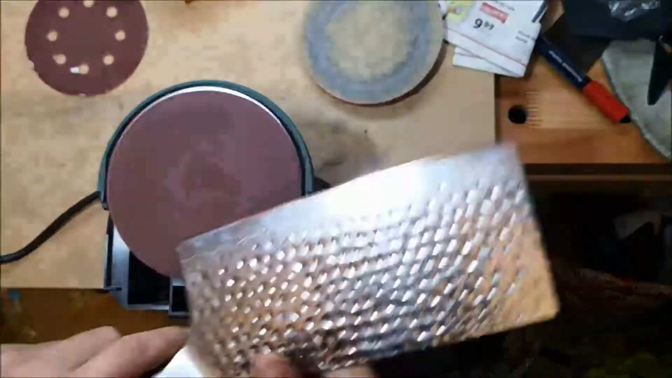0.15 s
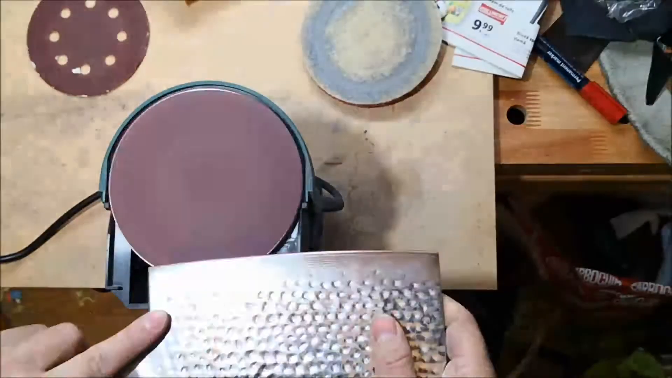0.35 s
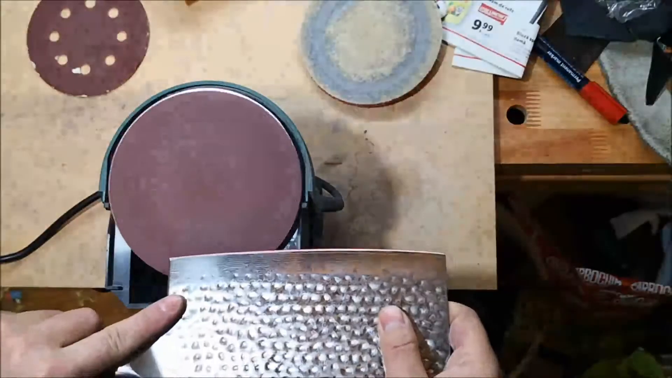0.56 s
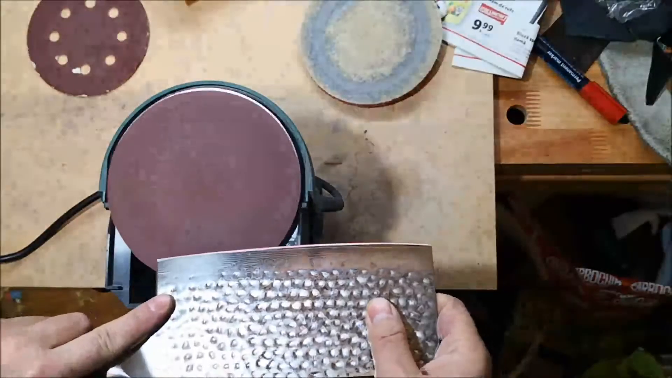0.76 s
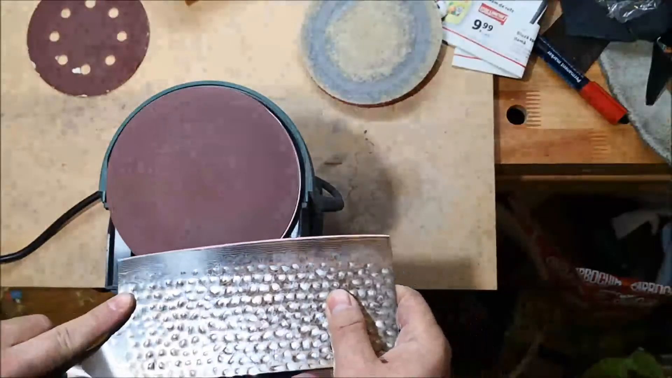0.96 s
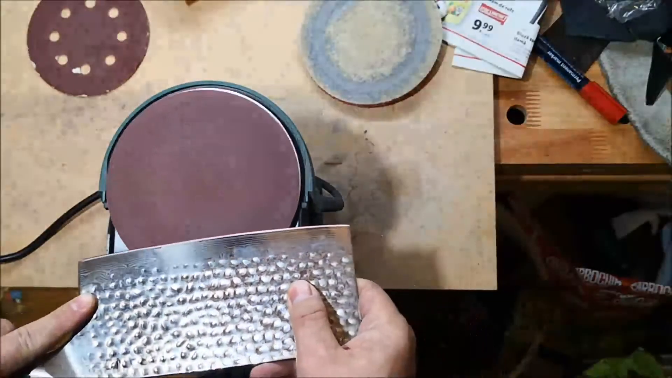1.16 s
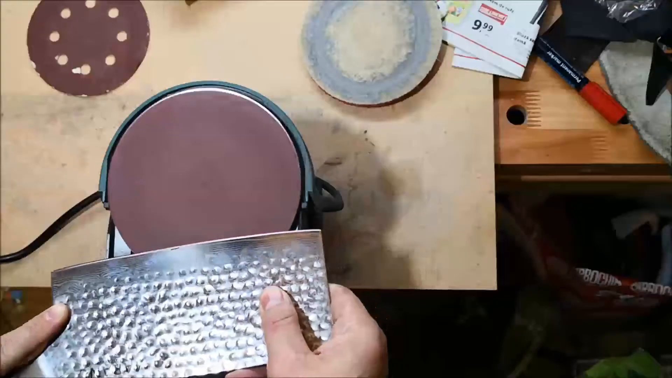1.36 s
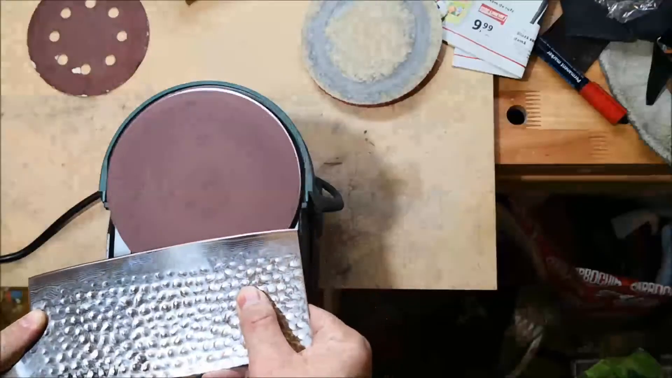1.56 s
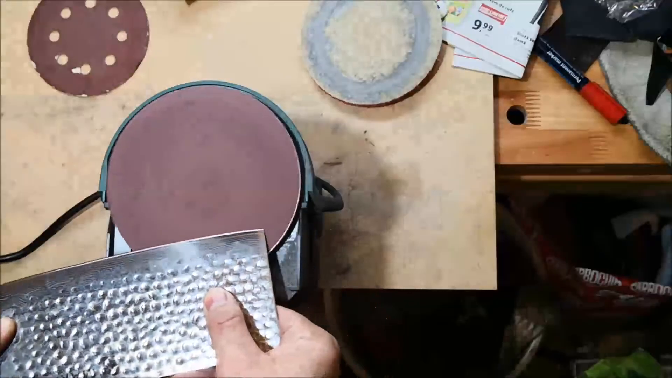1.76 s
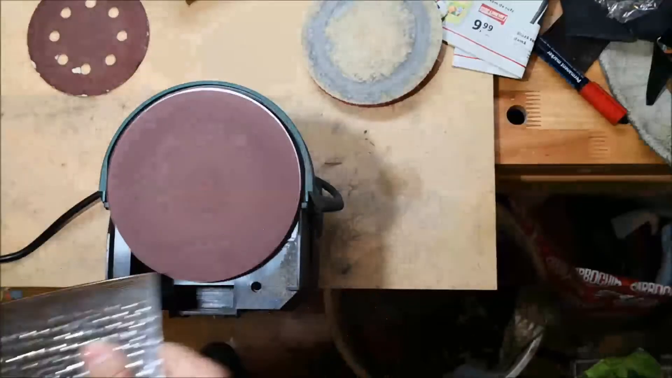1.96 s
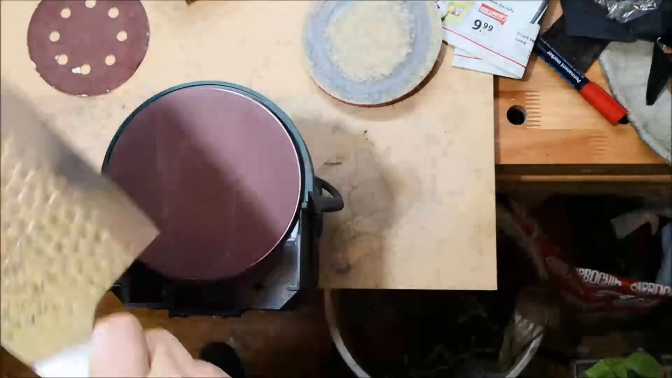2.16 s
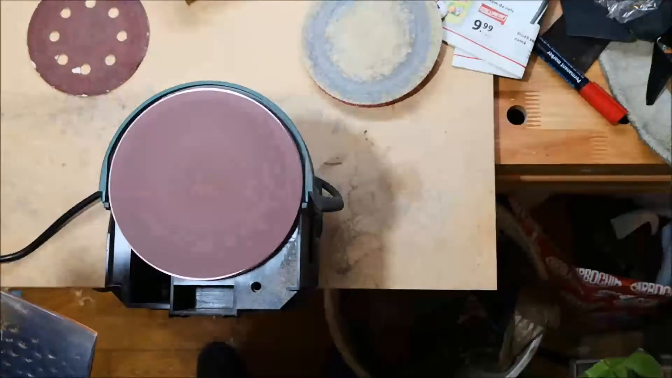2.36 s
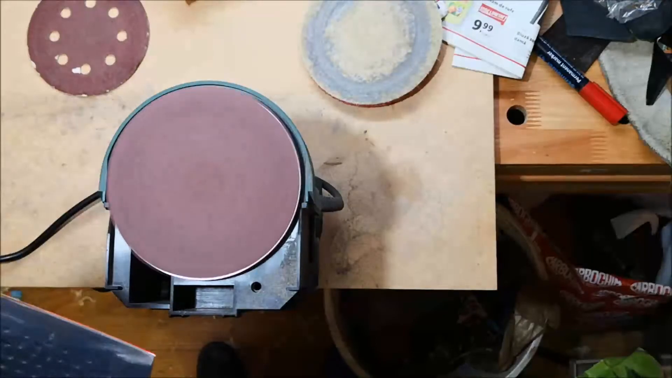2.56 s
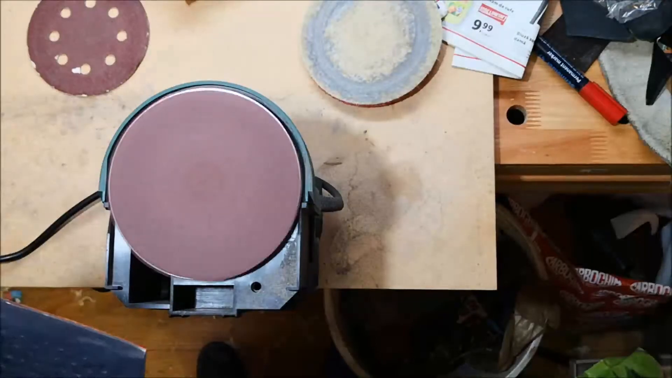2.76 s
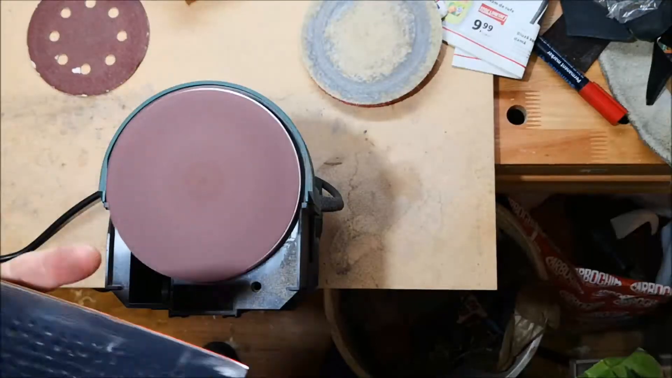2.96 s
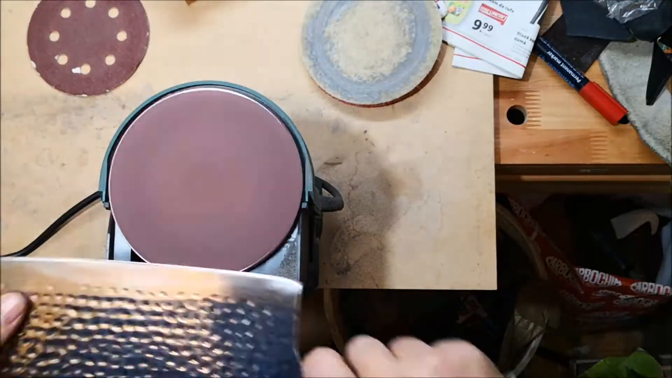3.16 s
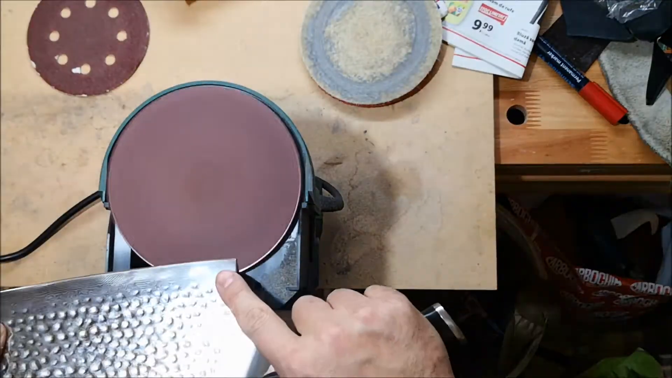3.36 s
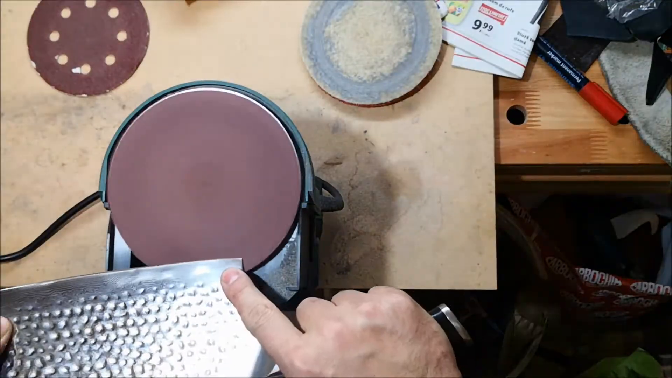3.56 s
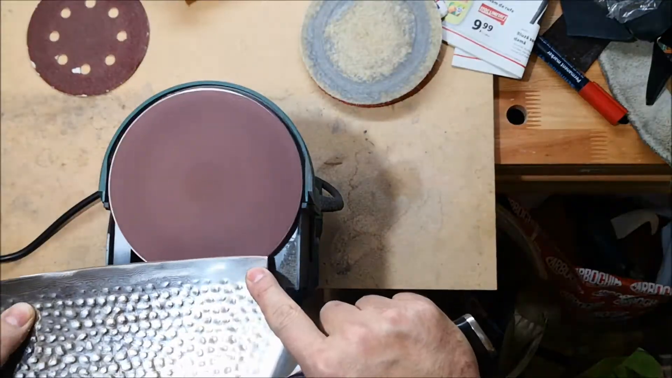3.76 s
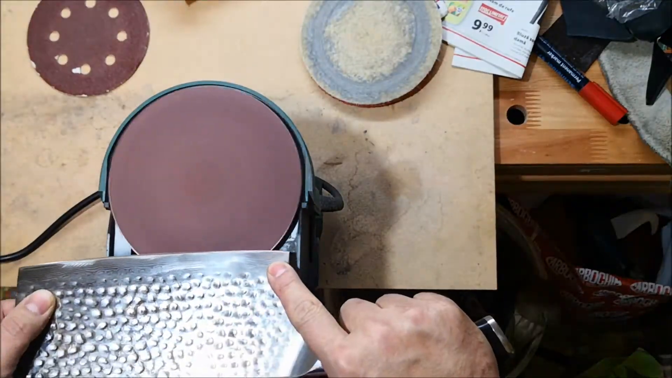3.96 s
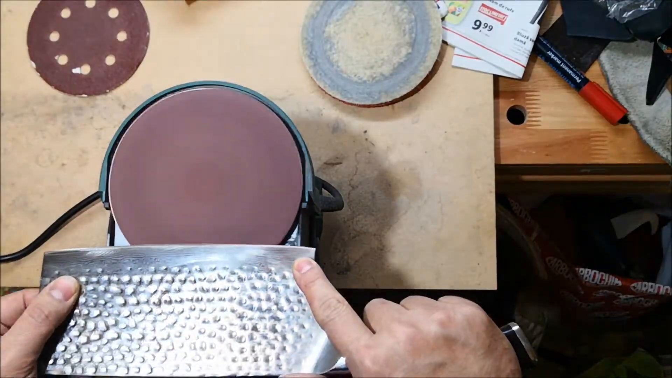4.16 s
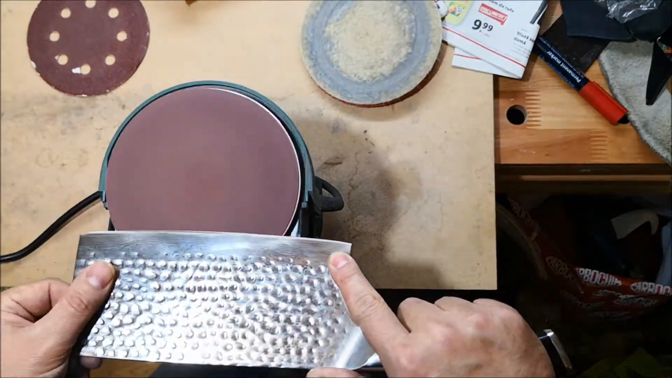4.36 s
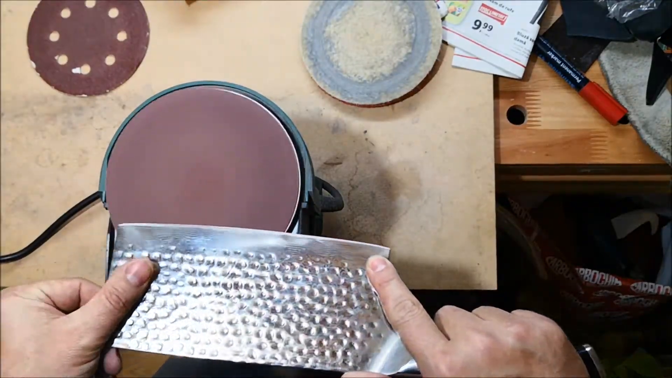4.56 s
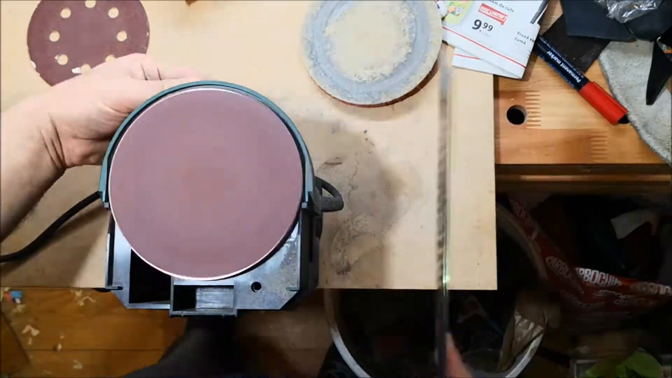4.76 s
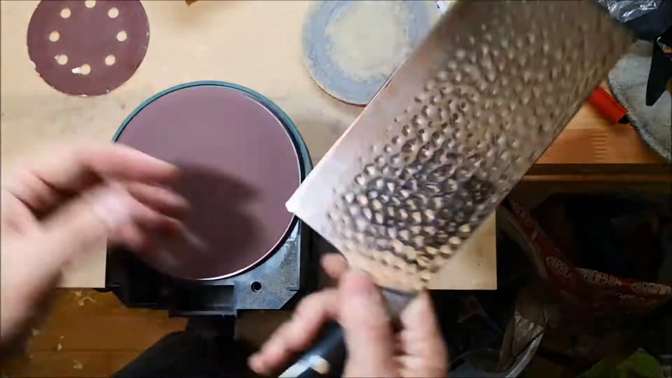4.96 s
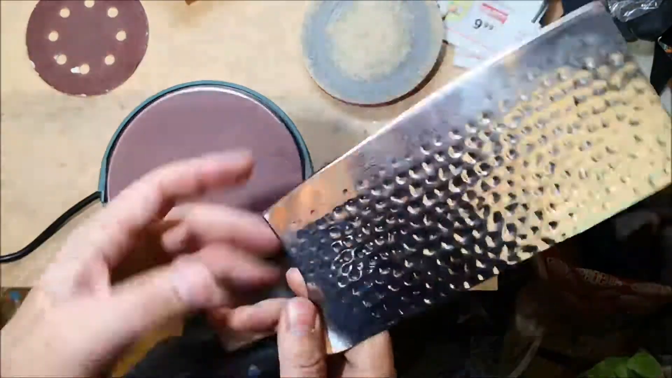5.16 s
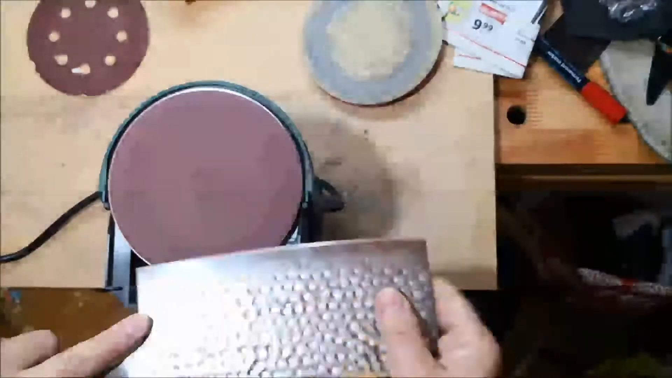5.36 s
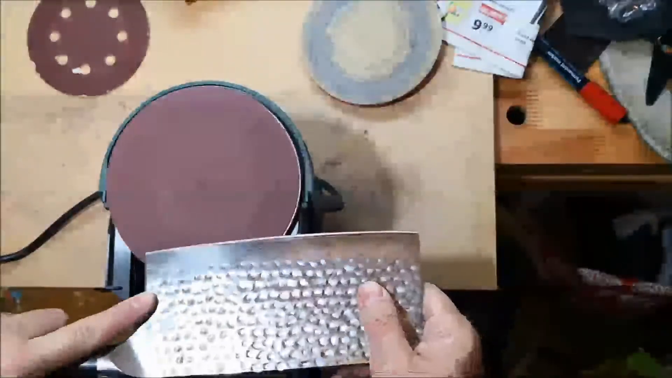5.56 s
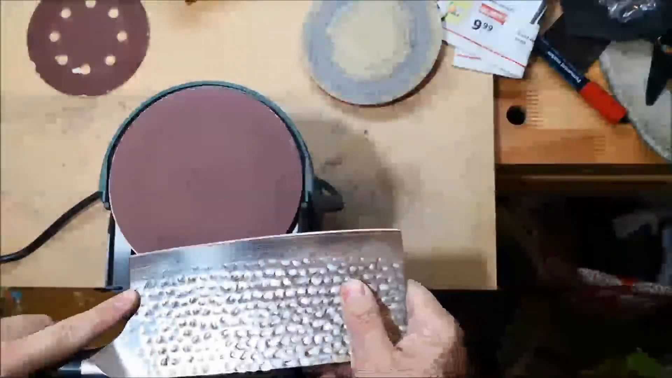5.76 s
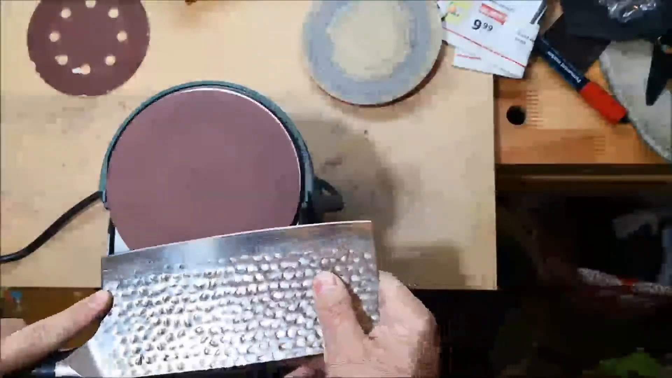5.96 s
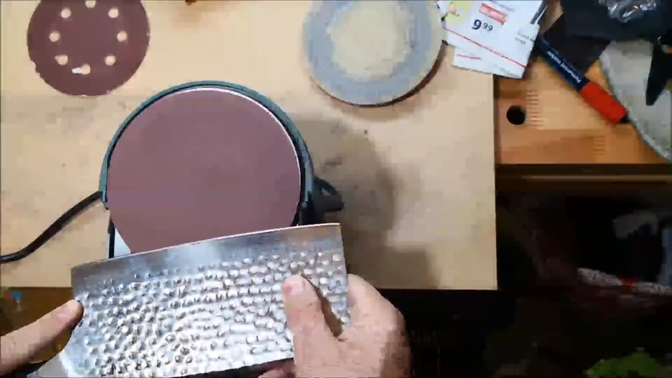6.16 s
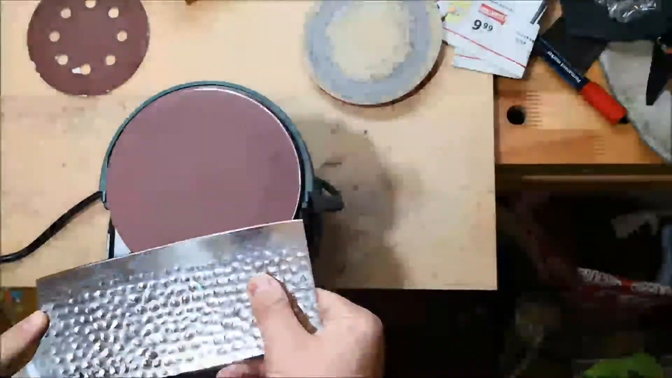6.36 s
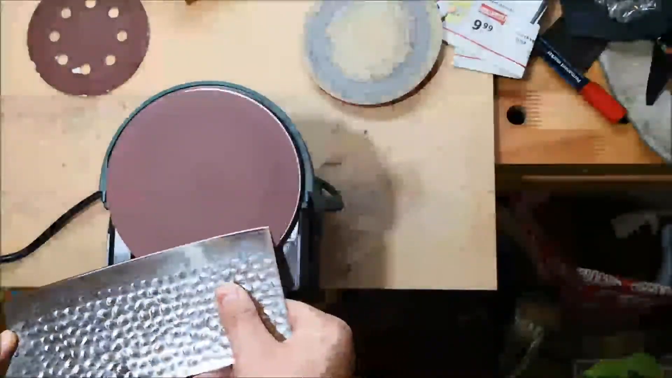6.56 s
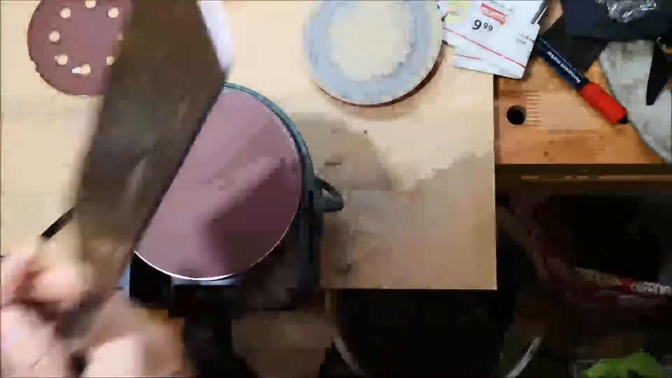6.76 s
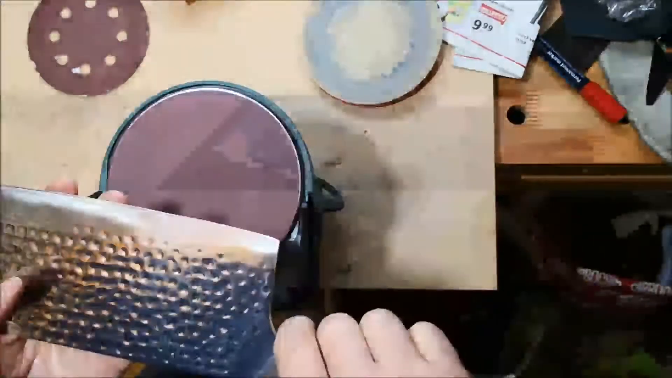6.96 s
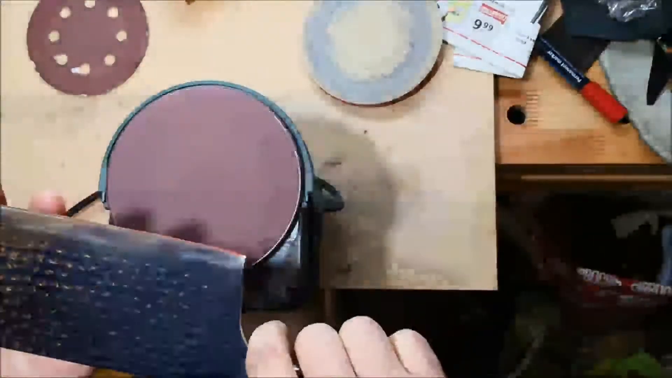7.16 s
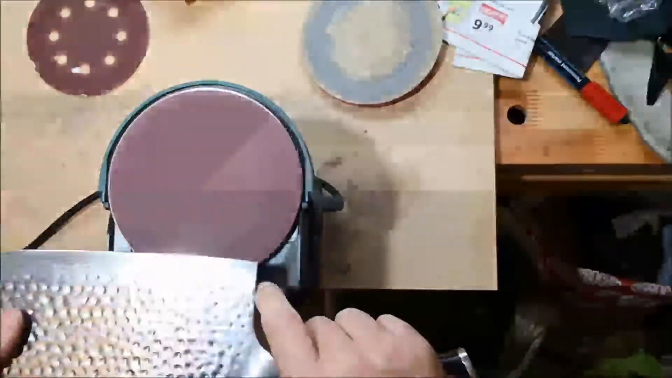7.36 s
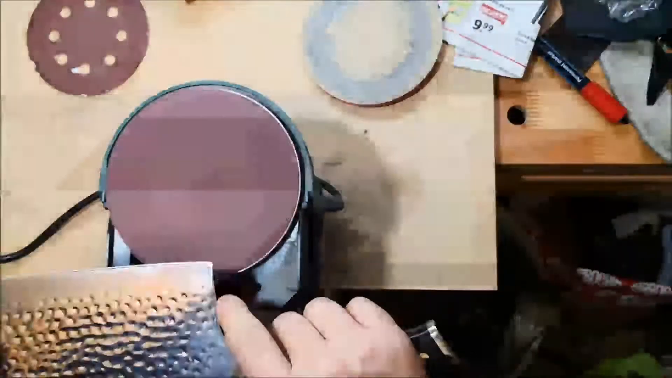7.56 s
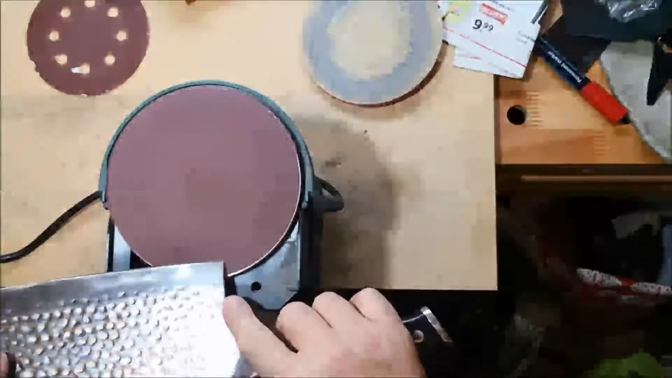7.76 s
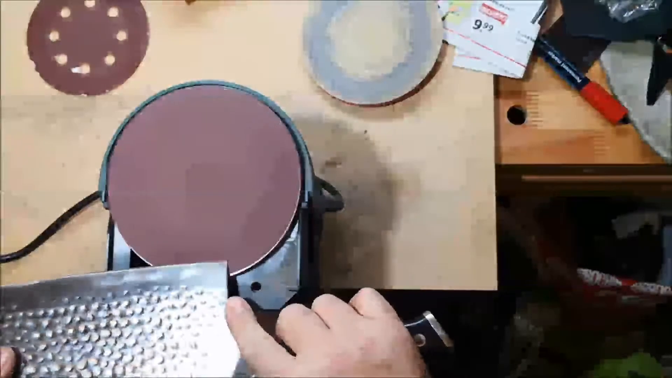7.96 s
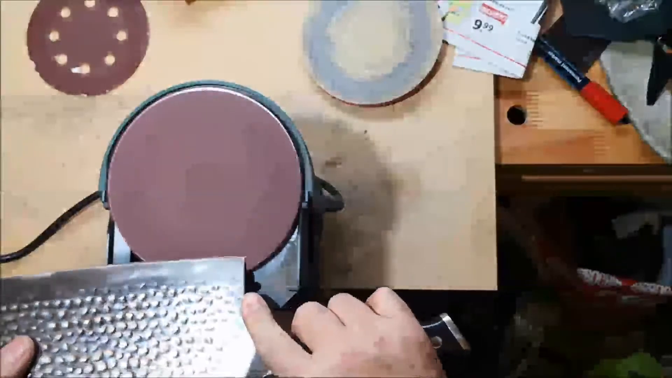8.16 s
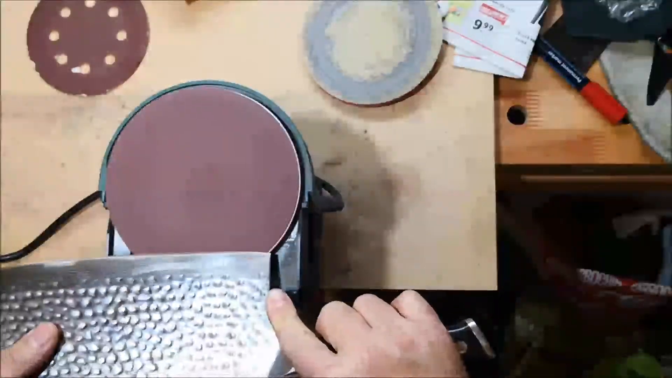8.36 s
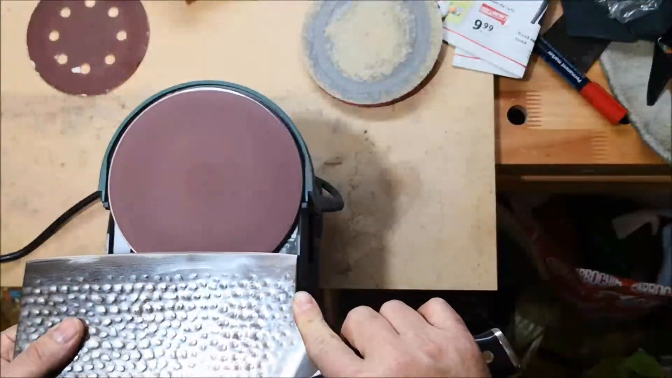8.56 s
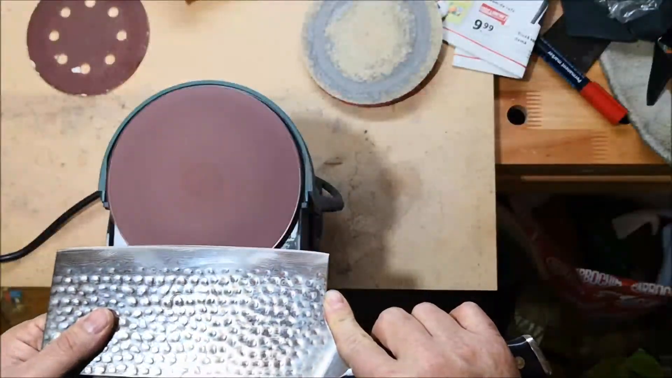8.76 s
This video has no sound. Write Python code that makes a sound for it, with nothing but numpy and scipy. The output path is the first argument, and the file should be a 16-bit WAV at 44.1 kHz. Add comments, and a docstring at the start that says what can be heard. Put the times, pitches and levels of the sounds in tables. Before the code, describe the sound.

Small disc sander whines steadily while a steel blade is ground in four hissing, ringing passes, motor sagging each time; motor speeds up midway.

```python
"""Disc sander grinding a steel blade

A small disc sander runs on a workbench while a broad blade is ground on it in four passes.
Chopped motor current sings on multiples of 400 Hz; shaft tones and fan noise follow as cosines and filtered
noise. The blade drags the shaft down, and the speed is turned up once. Grit, as filtered noise, hisses and
rings the blade's edge, throbbing with each turn; the uneven disc makes the blade chatter and the housing boom."""
import sys
import numpy as np
from scipy import signal
from scipy.fft import rfft, irfft
from scipy.io import wavfile
from scipy.ndimage import uniform_filter1d, map_coordinates

SR = 44100
rng = np.random.default_rng(int(sys.argv[2]) if len(sys.argv) > 2 else 0)


def master_out(mix):
    """Clip the mix to full scale and print it as 16-bit PCM to the path in sys.argv[1]."""
    frames = np.transpose(np.atleast_2d(mix))
    ceiling = np.clip(frames, -1, 1)
    pcm = np.round(ceiling * 32767).astype(np.int16)
    wavfile.write(sys.argv[1], SR, pcm)


N = 389403
T, HZ = np.arange(N) / SR, np.fft.rfftfreq(N, 1 / SR)


def amp(db):
    """Decibels to linear gain."""
    return 10 ** (np.asarray(db) / 20)


def evened(x):
    """Scales to rms 1 over all channels."""
    return x / np.sqrt(np.mean(x ** 2) + 1e-20)


def steady(x, size=3001):
    """Holds the slow level of a stereo signal at 1 and keeps its flutter; size in samples."""
    return x / np.sqrt(uniform_filter1d((x ** 2).mean(0), size) + 1e-12)


def curve(rows):
    """A time table at every sample."""
    return np.interp(T, *np.transpose(rows))


def read(rows, hz=HZ):
    """Each column of a frequency table, interpolated on a log axis."""
    f, *columns = np.transpose(rows)
    return np.array([np.interp(np.log(hz + 1), np.log(f + 1), c) for c in columns])


def drift(rate_hz):
    """Low-passed noise of rms 1."""
    spectrum = rfft(rng.standard_normal(N))
    return evened(irfft(spectrum * np.exp(-(HZ / rate_hz) ** 2), N))


def rise(seconds, time_s, shape=1):
    """Climbs from 0 towards 1 once seconds is positive; a shape over 1 starts softly."""
    return 1 - np.exp(-(np.maximum(seconds, 0) / time_s) ** shape)


def lag(x, time_s):
    """Follows x sluggishly, as a one-pole low-pass."""
    keep = np.exp(-1 / (time_s * SR))
    return signal.lfilter([1 - keep], [1, -keep], x)


def modes(rows):
    """Gain over frequency of a set of steep-sided resonances, one row for each level column."""
    power = 0
    for hz, width_hz, *db in rows:
        power = power + amp(db)[:, None] ** 2 / (1 + (2.14 * (HZ - hz) / width_hz) ** 2) ** 2
    return np.sqrt(power)


# stereo spread: f/Hz, left-right likeness/0-1, lead of left over right/rad
STEREO = [(60, 1, 1), (685, 0.82, 0.36), (1340, 0.7, 0.7), (2840, 0.48, 1.87), (5430, 0.74, 0.13),
          (7200, 1, 1.52), (7700, 0.85, 2), (10900, 0.41, 2.5), (15500, 0.61, 4)]


def radiate(pair, gain):
    """Colours two unrelated signals and blends them into left and right, at rms 1."""
    same, lead_rad = read(STEREO)
    same = np.clip(same, 0, 1)
    a, b = rfft(pair)
    right = (same * a + np.sqrt(1 - same ** 2) * b) * np.exp(-1j * lead_rad)
    return evened(irfft(np.array([a, right]) * gain, N))


def track(turns, size, wear_per_s):
    """Unevenness round the disc, met again on every turn and slowly renewed by wear."""
    age = T * wear_per_s
    ground = rng.standard_normal((200, size))
    return evened(map_coordinates(ground, [age, turns % 1 * size], order=1, mode="grid-wrap"))


SLOW_HZ, FAST_HZ = 71.5, 87.3  # free shaft rate at each setting
DIAL_S, SPIN_UP_S, INERTIA_S = 4.875, .02, .044  # speed turned up at, dial travel time, shaft lag
LEAN_S, LEAN_TIME_S, LEAN_SAG_HZ = 8.1, .11, 6.4  # the hand leans in harder in the last pass
PRESS_CURVE = 1.7  # the hands press gently at first
# blade on disc: start/s, end/s, press time/s, ease-off time/s, shaft sag/Hz, motor load (1 = full),
# hiss at first: level/dB, hiss at last: level/dB, hiss tilt/dB (top up, rest down by this each),
# pan swing to left at mid-stroke/dB, base chatter low, middle, high: level/dB, boom: level/dB
PASSES = [(.547, 2.045, .19, .055, 28, 1.05, -34.8, -37.3, .4, -.5, -70, -71, -75, -95),
          (3.387, 4.708, .122, .08, 30.8, .88, -42, -38.8, -1.2, -4, -72.5, -64.5, -66.5, -82),
          (5.534, 6.758, .106, .03, 25.2, .92, -35, -38, 1.3, .5, -73.5, -68, -61, -79),
          (7.852, 8.9, .067, .045, 23.3, 1.05, -39, -38.7, -1.2, -5, -65.5, -64.5, -62.5, -96)]


def motor(current_law=0.38, current_lag_s=0.035):
    """The dial sets the speed and the blade drags it down: returns speed in Hz, dial 0-1 and load."""
    drag_hz = LEAN_SAG_HZ * rise(T - LEAN_S, LEAN_TIME_S, PRESS_CURVE)
    load = 0
    for start, end, press_s, ease_s, sag_hz, current, *_ in PASSES:
        pressure = rise(T - start, press_s, PRESS_CURVE) * rise(end - T, ease_s)
        drag_hz = drag_hz + sag_hz * pressure
        load = load + current * pressure ** current_law
    dial = lag(rise(T - DIAL_S, SPIN_UP_S), INERTIA_S)
    speed_hz = SLOW_HZ + (FAST_HZ - SLOW_HZ) * dial - lag(drag_hz, INERTIA_S)
    return speed_hz, dial, lag(load, current_lag_s)


# rush of disc and fan: f/Hz, relative density level/dB
AIR = [(15, -1), (30, 3), (80, -8.5), (130, -3.5), (280, -6), (420, -2.5), (800, -5), (1250, -1.5),
       (1600, -0.5), (2100, 2.5), (4200, -7.5), (6500, -8), (10000, -9), (15800, -13.5)]


def air(turns, rush_db=-70, brush_db=-73):
    """The fan's rush is filtered noise; the brushes' rasp nearly repeats with each turn."""
    rush = radiate(rng.standard_normal((2, N)), amp(read(AIR)))
    rasp = np.array([track(turns, size=400, wear_per_s=0.64) for _ in range(2)])
    # f/Hz, width/Hz, level/dB
    colour = modes([(1166, 240, 4), (2090, 210, 4.5), (3220, 590, 3.0), (5070, 690, 0.5), (8140, 2700, 3.5)])
    return amp(rush_db) * rush + amp(brush_db) * radiate(rasp, colour)


CHOPPER_HZ = 400
# song of the chopped current: multiple of chopper rate, idle slow level/dB,
# change at load 1/dB, change at fast setting/dB
CHOPPER = [(2, -85, 21.5, -5), (3, -65, 4, 0), (4, -81, 6.5, -2), (5, -81, 2, -2.5), (6, -90.5, 7.5, -6),
           (7, -94, 21, -2), (8, -94, 16.5, 2.5), (9, -84, -14, 2.5), (10, -89, 18.5, 0),
           (12, -97, 28.5, -8), (13, -88, 15, 3), (16, -79.5, 1.5, 0.5), (18, -92, 4, 3),
           (19, -92, -10, -7), (20, -86.5, -22, 3), (21, -90, 13, -2), (22, -101, 0, 4), (23, -86, 28, -6),
           (26, -86, 18, -2)]


def chopper(load, dial, waver_db=1.15, right_db=0.5):
    """Current pulses shake the motor at fixed harmonics, whose levels shift with load and dial."""
    out = np.zeros((2, N))
    wavers = [drift(7.4) for _ in range(3)]
    for index, (multiple, idle_db, load_db, fast_db) in enumerate(CHOPPER):
        hz = multiple * CHOPPER_HZ
        lead_rad = read(STEREO, hz)[1]
        phase = 2 * np.pi * (hz * T + rng.random()) - np.array([[0], [lead_rad]])
        level_db = idle_db + load_db * load + fast_db * dial + waver_db * wavers[index % len(wavers)]
        out += amp(level_db) * np.sqrt(2) * np.cos(phase)
    return out * amp([[0], [right_db]])


ROCK_SLOW_DB, ROCK_FAST_DB, ROCK_PINNED_DB = -76.5, -68.5, -81  # at each setting, and under a hard push
# shaft tones: multiple of shaft rate, slow level/dB, fast level/dB
ORDERS = [(2.61, -87.5, -80.5), (2.85, -96, -99), (5.04, -100, -93), (11.98, -97, -73), (22.9, -96, -85.5),
          (25.96, -85, -83), (28, -117, -91), (47.7, -92, -89), (59.6, -98, -86.5), (76, -99, -86)]
# housing response to the armature whine: f/Hz, left level/dB, right level/dB
WHINE = [(1450, -110, -106), (2080, -104, -71.5), (2310, -71, -70.5), (2564, -57, -74),
         (2556.5, -56.5, -63.5), (2730, -73.5, -86), (2940, -62.5, -61.5), (3040, -65, -62.5)]


def shaft(speed_hz, dial, turns, load, whine_order=36, waver_db=0.7, flutter_db=2, load_lift_db=1.0,
          firm_sag_hz=29, wobble_db=2):
    """Imbalance, bearing and armature tones follow the shaft; load lifts hum and whine, and whine flutters."""
    fast = np.clip((speed_hz - SLOW_HZ) / (FAST_HZ - SLOW_HZ), -.2, 1.1)
    sag_hz = SLOW_HZ + (FAST_HZ - SLOW_HZ) * dial - speed_hz
    firm = np.minimum((sag_hz / firm_sag_hz) ** 8, 1)  # only a hard push pins the rocking

    free_db = ROCK_SLOW_DB + (ROCK_FAST_DB - ROCK_SLOW_DB) * dial
    rock_db = free_db + (ROCK_PINNED_DB - free_db) * firm
    rock_db = rock_db + (.7 + wobble_db * load) * drift(3.9)
    rocking = amp(rock_db) * np.cos(2 * np.pi * turns + 2.3 * load * drift(7.6))

    hum = 0
    for order, slow_db, fast_db in ORDERS:
        tone = np.cos(2 * np.pi * (order * turns + rng.random()))
        hum = hum + amp(slow_db + (fast_db - slow_db) * fast) * tone

    lead_rad = np.interp(speed_hz, [SLOW_HZ, FAST_HZ], [1.8, .4])
    whine_db = read(WHINE, whine_order * speed_hz) + (waver_db + flutter_db * load) * drift(26)
    whine = amp(whine_db) * np.cos(2 * np.pi * whine_order * turns + np.outer([1, 0], lead_rad))
    return np.sqrt(2) * (rocking + amp(load_lift_db * load) * (hum + whine))


# blade knocking on the machine: t/s, level/dB, f/Hz, t60/s
KNOCKS = [(1.084, -55.5, 410, 0.094), (1.099, -59.5, 263, 0.13), (3.908, -65, 360, 0.24)]
# steel on grit, and handling: t/s, level/dB
TICKS = [(0.559, -38), (2.26, -68), (3.285, -62), (3.405, -35), (5.02, -64), (5.545, -42)]


def contacts(tick_t60_s=0.026):
    """Dull knocks of the held blade are decaying sines; bright ticks are bursts of hiss-coloured noise."""
    knocks = 0
    for at_s, db, hz, t60_s in KNOCKS:
        decay = (T > at_s) * amp(db - 60 * abs(T - at_s) / t60_s)
        knocks = knocks + decay * np.sin(2 * np.pi * hz * (T - at_s))
    ticks = sum((T > at_s) * amp(db - 60 * abs(T - at_s) / tick_t60_s) for at_s, db in TICKS)
    return knocks + ticks * radiate(rng.standard_normal((2, N)), amp(read(HISS)))


def grit(throb_db, grain_db=-1.5):
    """Countless grains of uneven size scratch the steel, harder on the high spots."""
    return rng.standard_normal((2, N)) * amp(throb_db + grain_db * drift(2500))


def fine_modes(spread_hz=70, depth=0.94):
    """The crowded modes of a thin plate leave narrow peaks and notches, different left and right."""
    place = HZ / spread_hz
    crowd = rng.standard_normal((2, 1200)) + 1j * rng.standard_normal((2, 1200))
    ripple = np.array([np.interp(place, np.arange(len(side)), side) for side in crowd])
    return abs(1 + depth * ripple)


def sliding(throb_db, gain, slide_hz=0.3978):
    """Grit heard through the blade, whose fine peaks and notches change as the contact slides along it."""
    angle = 2 * np.pi * slide_hz * T
    return sum(share * radiate(grit(throb_db), gain * fine_modes()) for share in (np.cos(angle), np.sin(angle)))


BITE_S, SEAT_S, LIFT_S = 0.023, 0.057, 0.035  # hiss starts first, blade body follows; both stop on lifting
USUAL_RING_DB = -45.5
HAND_DB, HAND_HZ = .3, 10  # the hands are never quite still
# edge ring as the bevel rocks on the disc, one curve a pass: t/s, level/dB
RING = [
    [(.6, -68), (.75, -51.5), (.97, -53.5), (1.05, -47.5), (1.3, -46), (1.42, -47.5), (2.0, -47)],
    [(3.44, -48.5), (3.62, -48), (3.74, -41), (3.8, -44), (4.0, -45), (4.3, -48), (4.4, -50), (4.68, -54.5)],
    [(5.6, -50.5), (5.71, -50.5), (5.85, -41), (6.06, -51.5), (6.22, -44.5), (6.38, -45), (6.46, -54.5),
     (6.73, -53.5)],
    [(7.9, -53), (8.0, -40), (8.07, -47.5), (8.16, -43), (8.7, -41.5), (8.83, -48.5)],
]


def strokes(follow=(.3, .35, .6), ends_db=(-3, -2, -3), rest_pan_db=1):
    """Per-pass gains of hiss, ring, boom and 3 chatters (most at mid-stroke, hard ring); tilt, pan, firmness/dB."""
    total = np.zeros((9, N))
    for row, ring in zip(PASSES, RING):
        start, end, _, _, _, _, first_db, last_db, tilt_db, swing_db, *chatter_db, boom_db = row
        during = (T > start) & (T < end)
        t = T[during] - start
        along = t / (end - start)
        middle = np.sin(np.pi * along) ** 2
        held = np.clip((end - start - t) / LIFT_S, 0, 1)
        bite = held * rise(t, BITE_S, PRESS_CURVE)
        seated = held * rise(t, SEAT_S, PRESS_CURVE)
        ring_db = curve(ring)[during]
        firm_db = ring_db - USUAL_RING_DB
        chatter = [seated * amp(db + share * firm_db + end_db * (1.5 - middle))
                   for db, share, end_db in zip(chatter_db, follow, ends_db)]
        hiss = bite * amp(first_db + (last_db - first_db) * along)
        pan_db = rest_pan_db + swing_db * middle
        total[:, during] += [hiss, seated * amp(ring_db), bite * amp(boom_db), *chatter,
                             bite * tilt_db, bite * pan_db, bite * firm_db]
    total[:6] *= amp(HAND_DB * drift(HAND_HZ))
    return total


THROB_DB, THROB_GROWTH_PER_DB = 3.6, .07  # at the usual ring; exponential growth per dB of ring
SPOT_SHARPNESS = 7  # higher: narrower raised places
LOOSE = .52  # weight of noise against turn-locked lumps in the chatter
# raised places on the disc: share of a turn, relative height
HIGH_SPOTS = [(0, 1), (.7, .5), (.42, .3)]
# grit hiss: f/Hz, left relative density level/dB, right relative density level/dB
HISS = [(304, -32, -40.5), (1740, -32.5, -19.5), (2970, -30.5, -49), (4300, -26, -33), (4800, -18, -17),
        (6540, -16, -9), (8310, -7.5, -9), (9030, -1, -4.5), (11100, -0.5, -7.5), (12800, 0, -2),
        (13800, -7.5, -6.5), (16200, -8, -4.5)]
# thin-plate modes colouring the hiss: f/Hz, width/Hz, lift/dB
PLATE = [(8760, 110, 0), (10600, 270, 3), (11520, 290, 5.5), (13000, 110, 5), (14580, 490, 8)]
# modes rung by the edge: f/Hz, width/Hz, left relative level/dB, right relative level/dB
EDGE = [(3590, 430, -16.5, -18.5), (3980, 14, -1, -32), (4463, 84, -12.5, -6), (5134, 770, -9.5, -10.5),
        (6200, 1250, -8, -8.5), (6830, 400, -19, 2), (6936, 340, -3, 3.5), (7240, 340, -12, 2),
        (7880, 390, -9, 1), (9250, 155, -1, 1)]
# bending modes of the blade against the disc: f/Hz, width/Hz, relative level/dB
LOW_BENDS = [(408, 27, -8), (497, 44, 2.5), (577.5, 31, 1)]
# as above, middle: f/Hz, width/Hz, relative level/dB
MID_BENDS = [(828, 67, 0.088), (1052, 94, 0.41)]
# as above, high: f/Hz, width/Hz, relative level/dB
HIGH_BENDS = [(1262, 260, 0), (1530, 320, -12), (1930, 240, -16), (2410, 580, -10)]
# low boom of the machine's housing while the blade is pressed on: f/Hz, width/Hz, relative level/dB
BOOM = [(176, 160, -1), (229, 15, 7.5)]


def grinding(turns, hiss_throb=0.21, flutter_db=.5, ripple_db=1.0, chatter_waver_db=2.66):
    """Grit hisses and rings the edge; lumps of the disc drive the blade's bending modes and the housing."""
    bite, ring, boom, low, mid, high, tilt_db, pan_db, firm_db = strokes()

    spots = 0
    for at_turn, height in HIGH_SPOTS:
        spots = spots + height * np.exp(SPOT_SHARPNESS * (np.cos(2 * np.pi * (turns - at_turn)) - 1))
    rough = .65 * evened(spots - spots.mean()) + .3 * track(turns, size=14, wear_per_s=2.5)
    bumps = np.tanh(rough)  # the blade gives way to the highest
    throb_db = THROB_DB * np.exp(THROB_GROWTH_PER_DB * firm_db) * bumps
    throb_db = throb_db + flutter_db * drift(55)
    throb_db = throb_db + ripple_db * np.cos(2 * np.pi * CHOPPER_HZ * T)  # the torque ripples too

    plate_db = sum(db / (1 + (2 * (HZ - hz) / width_hz) ** 2) for hz, width_hz, db in PLATE)
    hiss = sliding(hiss_throb * throb_db, amp(read(HISS) + plate_db))
    top = irfft(rfft(hiss) / (1 + (11500 / (HZ + 1)) ** 10), N)  # above 11.5 kHz
    hiss = steady(top * amp(tilt_db) + (hiss - top) * amp(-tilt_db))
    edge = steady(sliding(throb_db, modes(EDGE)))
    scrape = (bite * hiss + ring * edge) * amp(np.outer([.5, -.5], pan_db))

    lumps = np.array([(1 - LOOSE) * track(turns, size=160, wear_per_s=2) + LOOSE * rng.standard_normal(N)
                      for _ in range(2)])
    lumps = lumps * amp(1.8 * throb_db)
    chatter = 0
    for gain, bends in [(low, LOW_BENDS), (mid, MID_BENDS), (high, HIGH_BENDS)]:
        waver = amp(chatter_waver_db * drift(8.3))
        chatter = chatter + gain * waver * steady(radiate(lumps, modes(bends)))
    return scrape + chatter + boom * radiate(lumps, modes(BOOM))


def scene():
    """Sums motor, shaft, air, contacts and grinding on one shared shaft angle."""
    speed_hz, dial, load = motor()
    # the drag of the blade unsteadies the shaft
    speed_hz = speed_hz * (1 + (0.00026 + 0.0034 * load) * drift(16.27))
    turns = np.cumsum(speed_hz) / SR
    machine = air(turns) + chopper(load, dial) + shaft(speed_hz, dial, turns, load)
    return machine + contacts() + grinding(turns)


EDGE_HZ = 15900


def record(dry):
    """Band limit: steep linear-phase low-pass at EDGE_HZ."""
    low_pass = signal.firwin(511, EDGE_HZ, window=("kaiser", 9), fs=SR)
    return signal.oaconvolve(dry, low_pass[None], "same")


dry = scene()
out = record(dry)
master_out(out)
```